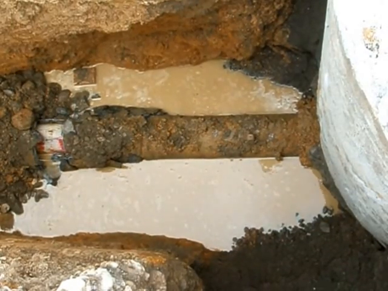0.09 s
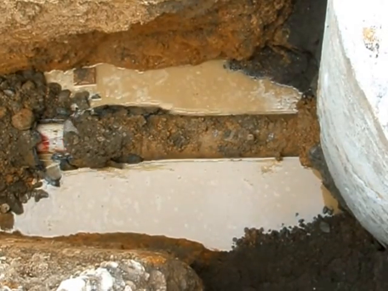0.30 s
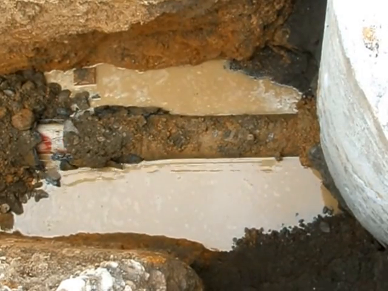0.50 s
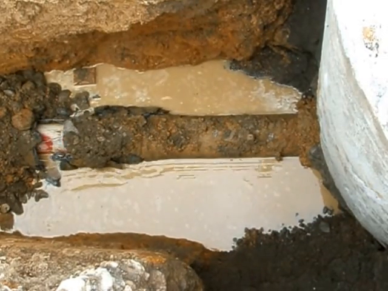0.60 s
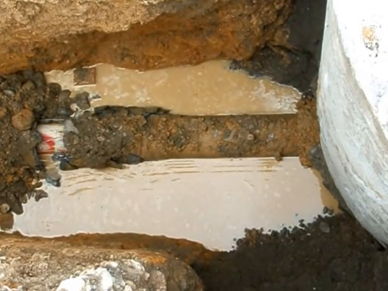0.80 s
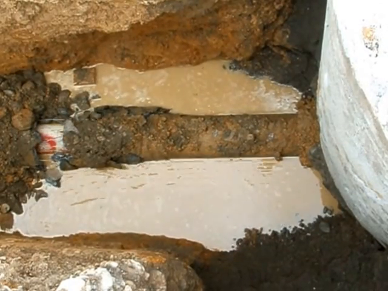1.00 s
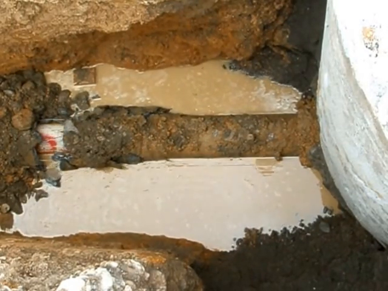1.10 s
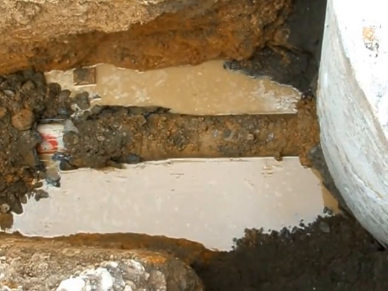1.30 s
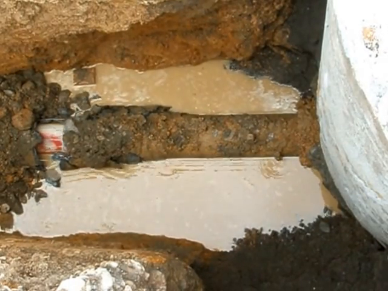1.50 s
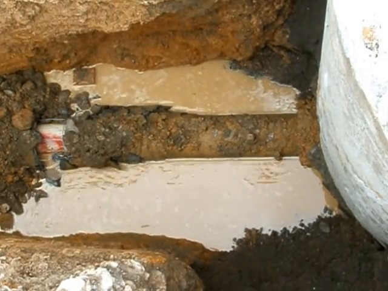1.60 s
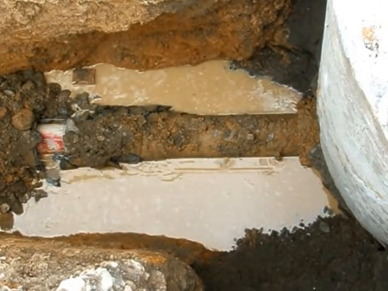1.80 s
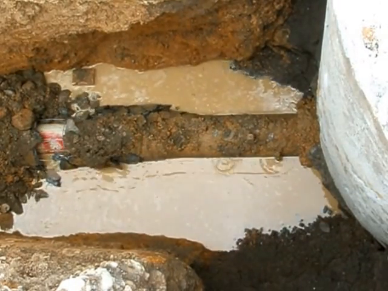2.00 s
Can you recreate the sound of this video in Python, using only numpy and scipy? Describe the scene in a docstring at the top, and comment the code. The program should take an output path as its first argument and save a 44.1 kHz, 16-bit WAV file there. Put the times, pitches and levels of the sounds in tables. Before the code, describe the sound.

Buried concrete pipe cracks and grinds, with two loud thudding breaks over a low engine drone

```python
"""At the edge of a trench, a bursting head is heard being dragged through a buried concrete pipe.
The wall grinds in short swells, snaps, and twice breaks through with a deep thud; shards clink.
Grinding and snaps are filtered trains of impulses; thuds and clinks are damped modes.
An engine, a sum of harmonic orders over noise, drones behind; the loudest breaks overload the microphone."""
import sys
import numpy as np
from scipy import signal
from scipy.fft import rfft, irfft, next_fast_len
from scipy.io import wavfile
from scipy.ndimage import map_coordinates

SR = 44100
rng = np.random.default_rng(int(sys.argv[2]) if len(sys.argv) > 2 else 0)


def wav_record(signal):
    """Record a signal, one row per channel, as 16-bit PCM in the file named by sys.argv[1]."""
    frames = np.transpose(np.atleast_2d(signal))
    bounded = np.clip(frames, -1, 1)
    # unit amplitude maps onto the largest positive 16-bit level
    quanta = np.round(bounded * 32767).astype(np.int16)
    wavfile.write(sys.argv[1], SR, quanta)


N = 88200
T = np.arange(N) / SR  # s

# Frequency response of the microphone channel. Each row: frequency in Hz, gain in dB.
MIC_RESPONSE = [(20, -14), (60, -6), (110, -1), (160, 0), (7600, 0), (7900, -5), (8150, -22), (8400, -60),
                (8700, -110)]
BAND_EDGE_HZ = MIC_RESPONSE[-1][0]


def amp(db):
    """Level law: decibels to an amplitude ratio."""
    return 10 ** (np.asarray(db) / 20)


def unit(x):
    """Normalisation to a root-mean-square value of 1."""
    return x / np.sqrt(np.mean(x ** 2) + 1e-20)


def along(points, hz):
    """Linear interpolation of (Hz, value) points over logarithmic frequency."""
    point_hz, value = np.transpose(points)
    return np.interp(np.log(hz + 1), np.log(point_hz + 1), value)


def curves(rows):
    """Linear interpolation in time: one curve for each column after the time."""
    s, *columns = np.transpose(rows)
    return [np.interp(T, s, column) for column in columns]


def wobble(rate):
    """Slow random modulation: a spline through random knots, rate of them a second."""
    return map_coordinates(rng.standard_normal(400), [T * rate], mode="wrap")


def filtered(x, response):
    """Zero-phase filtering: the spectrum times a real response of frequency."""
    size = next_fast_len(N + SR // 2)
    return irfft(rfft(x, size) * response(np.fft.rfftfreq(size, 1 / SR)), size)[:N]


def struck(x, gain, size=8192):
    """Minimum-phase filtering: a causal impulse response of unit energy, found by the cepstrum."""
    magnitude = np.maximum(gain(np.fft.rfftfreq(size, 1 / SR)), 1e-6)
    cepstrum = irfft(np.log(magnitude))
    # folding the cepstrum onto positive time makes the response causal
    cepstrum[1:size // 2] *= 2
    cepstrum[size // 2 + 1:] = 0
    impulse = irfft(np.exp(rfft(cepstrum)))
    return signal.fftconvolve(x, impulse / np.linalg.norm(impulse))[:N]


def dying(s, t60):
    """Exponential decay: a sudden start at s, then a fall of 60 dB in t60 seconds."""
    return (T >= s) * np.exp(-np.log(1000) * np.maximum(T - s, 0) / t60)


def ring(s, hz, t60):
    """Free vibration of one damped mode."""
    return dying(s, t60) * np.sin(2 * np.pi * hz * (T - s))


def grains():
    """Shot noise: a dense random train of tiny fractures of uneven size, rms 1."""
    grains_per_s, spread_db = 3000, 4.5
    hit = rng.random(N) < grains_per_s / SR
    size_db = spread_db * np.clip(rng.standard_normal(N), -2, 2)
    return unit(hit * rng.choice([-1, 1], N) * amp(size_db))


def engine():
    """Harmonic orders of a slightly unsteady rotation, over noise modulated at the firing pitch."""
    # Drone. Each row: time in seconds, firing pitch in Hz, level in dB.
    drone = [(0, 101.8, -35), (.12, 102.7, -34.5), (.22, 100.8, -39), (.45, 100.4, -42), (.9, 100.4, -41),
             (1.25, 100.6, -37), (1.5, 100.3, -36), (1.72, 99.7, -40), (2, 101, -44)]
    # Relative order levels in dB, at successive multiples of half the firing pitch.
    orders_db = [-21, -7.5, -12, 0, -18, -13, -19, -18, -17, -16, -21, -20]
    # Relative spectrum of the din. Each row: frequency in Hz, density in dB per Hz.
    din_colour = [(25, -15), (50, -15), (78, -17), (130, -11), (180, -5), (240, 0), (330, -3), (450, -7),
                  (650, -11), (1000, -13.5), (1350, -17.5), (2000, -16.3), (2600, -19.2), (3300, -18.8),
                  (4100, -21.3), (5200, -20.5), (7700, -26)]
    # Steady din of engine and dragged soil. Each row: time in seconds, level in dB before its wobble.
    din_course = [(0, -37.5), (.2, -38.5), (.42, -41), (.63, -40), (.9, -38.8), (1.2, -38.5), (1.4, -36.5),
                  (1.55, -36), (1.66, -39), (1.74, -42), (1.9, -41.3), (2, -39.5)]
    firing_hz, hum_db = curves(drone)
    turn = 2 * np.pi * np.cumsum(firing_hz / 2 * (1 + .003 * wobble(18))) / SR
    hum = np.zeros(N)
    for order, level in enumerate(orders_db, 1):
        phase = rng.uniform(0, 2 * np.pi) + .1 * wobble(25)
        hum += amp(level + 1.2 * wobble(11)) * np.sin(order * turn + phase)
    rough = rng.standard_normal(N) + grains()
    din = unit(filtered(rough, lambda hz: amp(along(din_colour, hz)) * (hz < BAND_EDGE_HZ)))
    din_db = curves(din_course)[0] + .9 * wobble(35)
    flutter = 1 + .25 * np.sin(2 * turn)
    return amp(hum_db) * unit(hum) + amp(din_db) * din * flutter


def trench(x):
    """Reverberation: the earth walls answer briefly by decaying noise, longest in the bass."""
    # Each row: frequency in Hz, 60 dB decay time in seconds.
    decay_times = [(150, .27), (400, .26), (1500, .16), (7000, .11)]
    hz, t, noise = signal.stft(rng.standard_normal(SR // 2), SR, nperseg=256)
    decay = np.exp(-np.log(1000) * t / along(decay_times, hz)[:, None])
    tail = signal.istft(noise * decay, SR, nperseg=256)[1]
    delay = np.zeros(SR // 250)  # 4 ms
    return signal.fftconvolve(x, np.r_[delay, tail / np.linalg.norm(tail)])[:N]


def concrete(force, centre_hz):
    """Source-filter principle: fractures coloured by concrete, pipe resonances and fragment size."""
    # Colour of breaking concrete. Each row: frequency in Hz, relative density in dB per Hz.
    grit_colour = [(100, -28), (350, -5), (650, 3), (1000, 2.5), (1300, -3), (1900, 0), (2400, -5.5),
                   (3300, -2.5), (4000, -8.5), (4800, -4.5), (5700, -5), (6500, -8), (7700, -11.5)]
    # Pipe resonances. Each row: frequency in Hz, half-power width in Hz, strength in dB before ring_db.
    resonances = [(670, 60, -2), (1040, 70, -3), (1290, 63, -8), (1565, 50, 3), (2010, 100, -2),
                  (2665, 45, -2), (3050, 64, -4), (3390, 90, -2), (4660, 180, -4), (5145, 80, -2)]
    ring_db = 1
    focus_db, focus_octaves = 7.2, .72  # each fragment favours a band set by its size

    def gain(hz):
        """Resonance: Lorentzian power peaks over a broad spectrum with a favoured band."""
        peaks = sum(amp(db + ring_db) ** 2 / (1 + (2 * (hz - c) / w) ** 2) for c, w, db in resonances)
        focus = focus_db * np.exp(-(np.log2((hz + 1) / centre_hz) / focus_octaves) ** 2)
        return amp(along(grit_colour, hz) + focus) * np.sqrt(1 + peaks) * (hz < BAND_EDGE_HZ)
    return struck(force, gain)


def crunches():
    """Superposed fractures: each push crushes grit and shakes the pipe in its bed."""
    # Each row: crest in seconds, rise and fall over 20 dB in seconds, grit level in dB,
    # body level in dB, centre of the grit in Hz.
    swells = [(.135, .03, .03, -49, -32, 1500), (.172, .05, .05, -36, -38, 4500),
              (.239, .014, .035, -19, -12.5, 1700), (.26, .01, .013, -18, -11, 900),
              (.281, .02, .025, -28, -28, 1900), (.298, .025, .022, -25, -21, 2000),
              (.378, .005, .04, -39, -32, 2500), (.48, .05, .08, -38, -38, 4000),
              (.554, .03, .055, -31, -29.5, 4500), (.678, .02, .05, -30.5, -27.5, 4500),
              (.737, .02, .03, -38, -41, 3500), (.808, .04, .045, -33, -28, 2000),
              (.888, .08, .04, -38, -37, 2500), (.973, .02, .045, -38, -27, 1800),
              (1.075, .06, .03, -33.5, -34, 6000), (1.167, .035, .035, -29.5, -35, 1600),
              (1.2835, .016, .028, -21.5, -26, 2300), (1.375, .04, .08, -39, -41, 6000),
              (1.433, .025, .035, -29, -41, 6000), (1.461, .016, .025, -23, -20.5, 4000),
              (1.483, .028, .029, -19, -17, 1900), (1.515, .03, .04, -36, -33, 3000),
              (1.565, .025, .05, -29, -29, 3800), (1.589, .01, .026, -18.5, -16, 3200),
              (1.619, .03, .028, -23.5, -19.5, 1900), (1.652, .03, .06, -47, -33, 1500),
              (1.776, .015, .06, -43, -48, 4500), (1.96, .08, .04, -42, -48, 5000),
              (1.99, .016, .06, -32.5, -41, 5500)]
    # Colour of pipe and soil. Each row: frequency in Hz, relative density in dB per Hz.
    body_colour = [(30, -42), (90, -26), (140, -10), (185, -5), (235, 1), (280, -1.5), (330, 2),
                   (385, -2.5), (440, -2), (600, -13), (1000, -21), (2500, -50)]
    grit, body_power = np.zeros(N), np.zeros(N)
    for s, rise, fall, grit_db, body_db, hz in swells:
        swell = 10 ** -np.maximum((s - T) / rise, (T - s) / fall)
        grit += concrete(amp(grit_db) * swell * grains(), hz)
        body_power += (amp(body_db) * swell) ** 2
    shake = np.sqrt(body_power) * rng.choice([-1, 1], N)
    return grit + struck(shake, lambda hz: amp(along(body_colour, hz)))


def snaps():
    """Transient fracture: a crack opens at once and crumbles away as decaying noise."""
    # Each row: start in seconds, starting level in dB before the colouring,
    # 60 dB decay time of the crumbling in seconds, centre in Hz.
    cracks = [(.2265, -13, .055, 2100), (.251, -15, .025, 5500), (.2553, -4.5, .016, 3800),
              (.285, -26, .025, 3500), (.338, -33, .02, 5200), (.375, -33.5, .025, 3000),
              (.669, -30, .04, 6000), (.700, -23.5, .025, 2800), (.948, -29, .08, 3800),
              (1.019, -35.5, .04, 4500), (1.131, -30, .04, 3500), (1.229, -37, .04, 5000),
              (1.2545, -24, .05, 3400), (1.4545, -23, .035, 3000), (1.5798, -8.5, .01, 3000)]
    out = np.zeros(N)
    for s, db, t60, hz in cracks:
        crumbling = amp(db) * dying(s, t60) * rng.choice([-1, 1], N)
        out += concrete(crumbling, hz)
    return out


def shards(spread=.06, count=5):
    """Modal vibration: each shard clinks with a few close damped modes."""
    # Each row: earliest start in seconds, middle pitch in Hz, level in dB before the share of each
    # mode, 60 dB decay time in seconds.
    clinks = [(.2925, 5700, -15, .025), (.295, 6500, -22, .05), (1.4845, 5000, -13, .03),
              (1.561, 4950, -19, .02), (1.5798, 4900, -3.5, .01)]
    out = np.zeros(N)
    for s, hz, db, t60 in clinks:
        for detune in 1 + spread * rng.uniform(-1, 1, count):
            start = s + rng.uniform(0, .0004)
            out += amp(db - 7) * ring(start, hz * detune, t60)  # 7 dB down for each of the modes
    return out


def breaks():
    """Impulsive excitation of modes: a short punch as the wall parts, and a thud in the soil."""
    # Each row: start in seconds, thud level in dB before a 3 dB lift, punch level in dB,
    # pitch of the thud in Hz.
    blows = [(.2565, -5.5, -3, 205), (.2625, -2, -15, 255), (.302, -13, -24, 240), (1.5799, -7, -2, 230),
             (1.5872, -8.5, -15, 200), (1.602, -17, -28, 190)]
    # Modes of the punch. Each row: frequency in Hz, relative level in dB, 60 dB decay time in seconds.
    punch_modes = [(520, -2, .012), (740, -1, .01), (1030, -2, .008)]
    thud_t60, thud_rise_s = .04, .002
    out = np.zeros(N)
    for s, thud_db, punch_db, hz in blows:
        rise = 1 - np.exp(-np.maximum(T - s, 0) / thud_rise_s)
        thud = rise * ring(s, hz, thud_t60)
        punch = sum(amp(db) * ring(s, mode_hz, t60) for mode_hz, db, t60 in punch_modes)
        out += amp(thud_db + 3) * thud + amp(punch_db) * punch
    return out


def scene():
    """Superposition: the breaking pipe, its reverberation in the trench, and the engine."""
    trench_db = -15
    pipe = crunches() + snaps() + breaks() + shards()
    return (pipe + amp(trench_db) * trench(pipe) + engine())[None]


def record(dry):
    """Saturation and band limiting: a narrow microphone channel overloads, then clips."""
    overload, clip_top = 1.05, 1  # amplitudes
    top_hz = 15900
    squashed = dry[0] / (1 + np.abs(dry[0] / overload) ** 6) ** (1 / 6)
    heard = filtered(squashed, lambda hz: amp(along(MIC_RESPONSE, hz)))
    clipped = np.clip(heard, -clip_top, clip_top)
    return filtered(clipped, lambda hz: hz < top_hz)[None]


dry = scene()
out = record(dry)
wav_record(out)
```